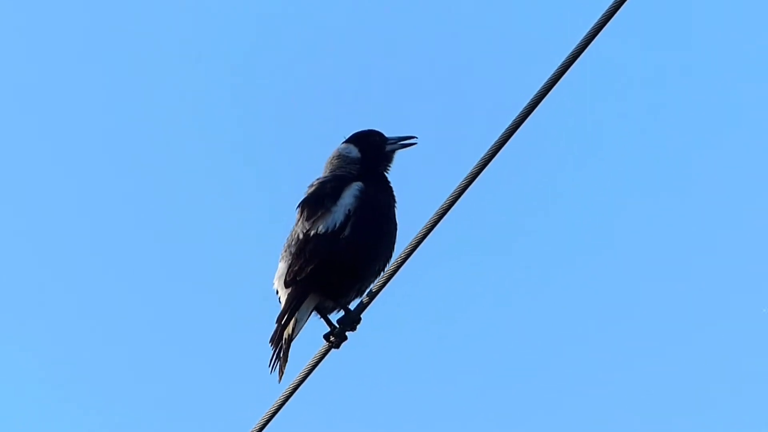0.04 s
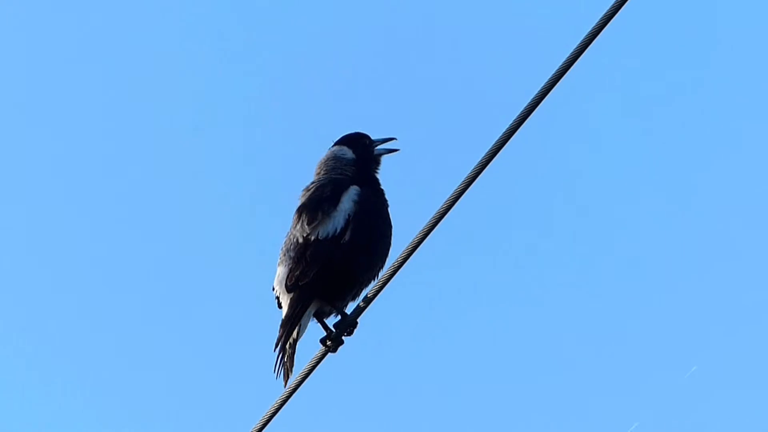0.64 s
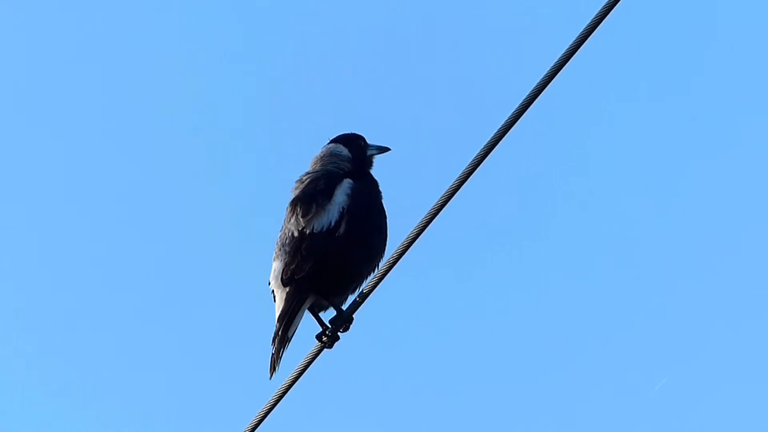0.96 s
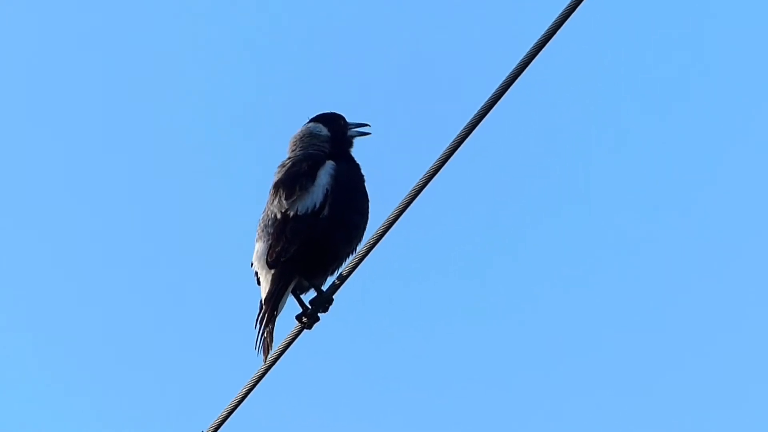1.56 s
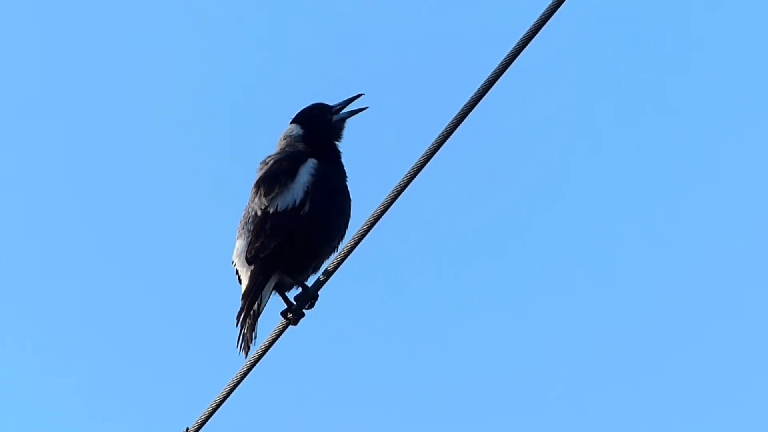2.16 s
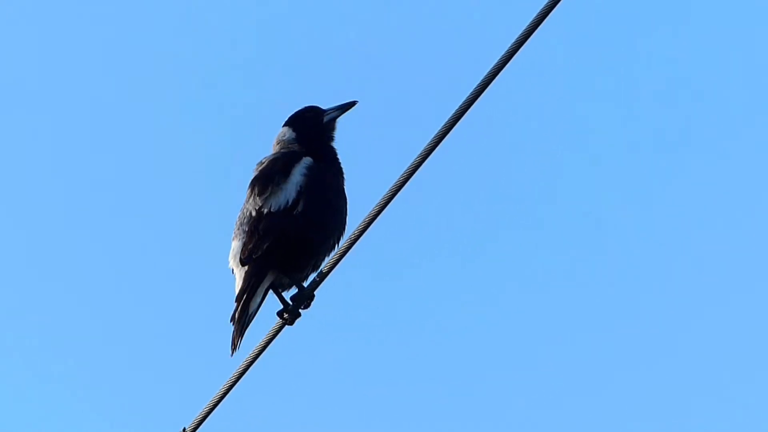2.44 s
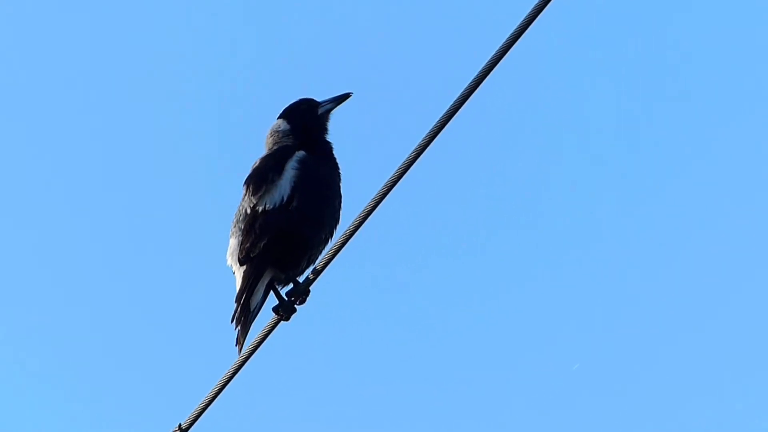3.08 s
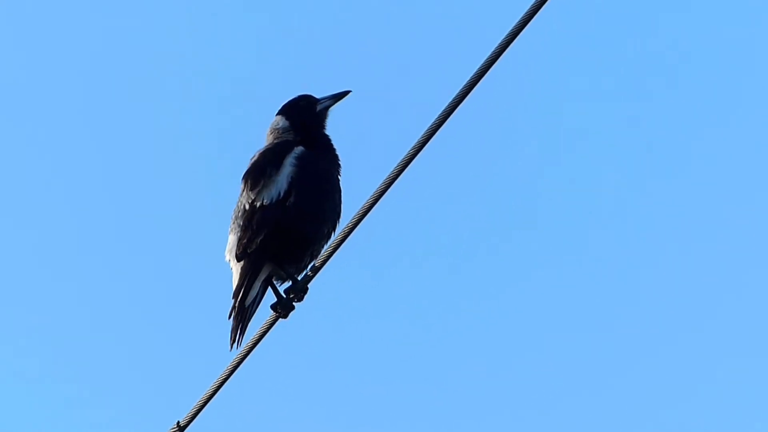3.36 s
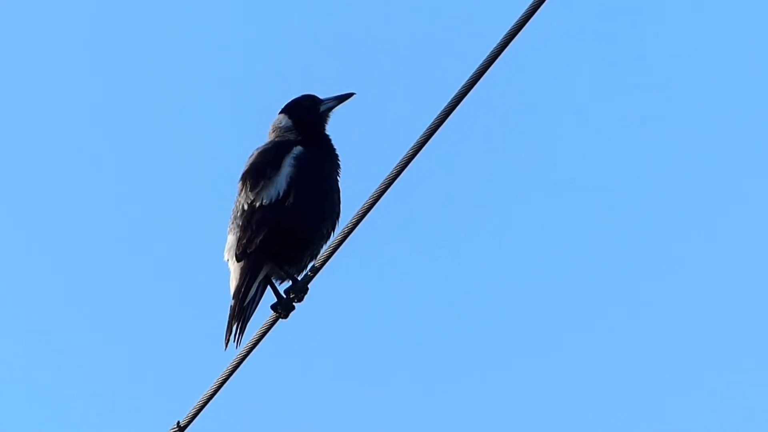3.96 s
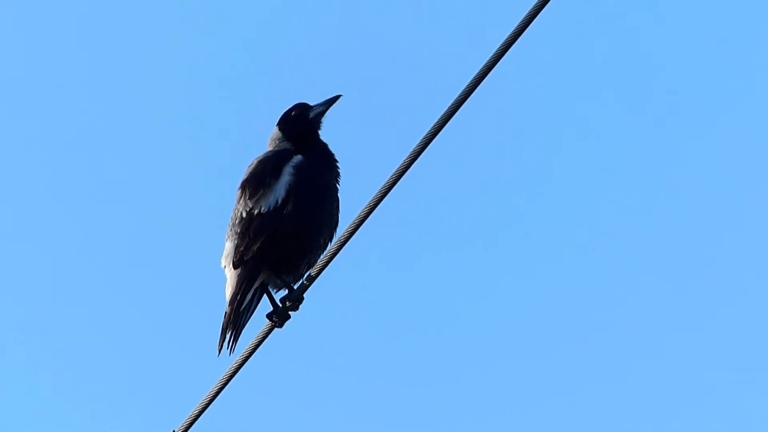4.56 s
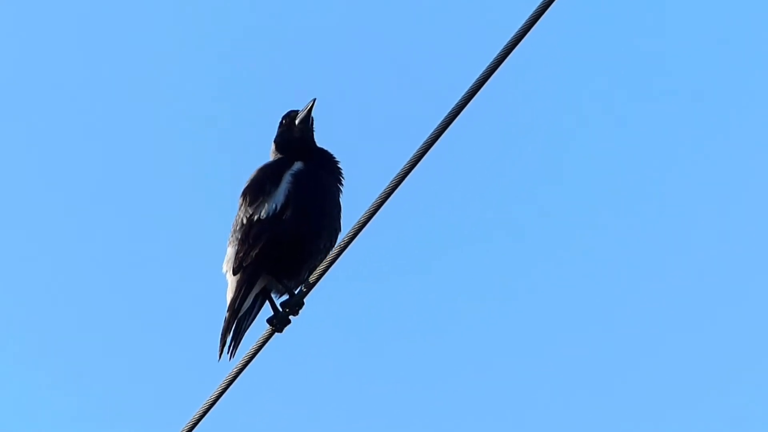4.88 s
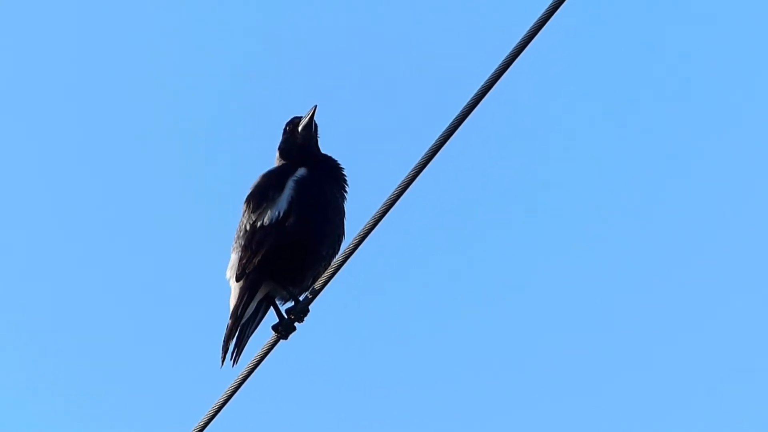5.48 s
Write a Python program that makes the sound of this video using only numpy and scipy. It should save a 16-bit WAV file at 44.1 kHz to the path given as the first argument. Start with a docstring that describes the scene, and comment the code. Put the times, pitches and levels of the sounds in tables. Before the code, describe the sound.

Short warbling, sometimes raspy magpie phrases, with a small bird chipping to the right and a soft traffic murmur behind.

```python
"""A magpie warbles straight ahead, its voice turning harsh and then clear again.
It sings with both sides of its voice box (the syrinx), so two close tones beat against each other.
A smaller bird to the right chips and slurs, others twitter further off; houses throw back echoes.
Distant traffic murmurs under it all, and one soft knock sounds near the end."""
import sys
import numpy as np
from scipy import signal
from scipy.fft import rfft, irfft
from scipy.io import wavfile
from scipy.ndimage import uniform_filter1d

SR = 44100
rng = np.random.default_rng(int(sys.argv[2]) if len(sys.argv) > 2 else 0)


def pcm_store(signal):
    """Save signal as 16-bit PCM."""
    levels = np.round(np.clip(np.atleast_2d(signal), -1, 1) * 32767)
    wavfile.write(sys.argv[1], SR, levels.astype(np.int16).T)


N = 252252
T = np.arange(N) / SR


def magpie(rough_hz=95, jitter=0.0045, rasp=0.14, hiss_db=-16, sharpness=0.68, ring_db=-12):
    """Two membranes share one airflow; its peaks make overtones and hiss, which the windpipe colours."""
    # windpipe resonances with the beak half open: f/Hz, level/dB
    windpipe_half = [(1600, 8), (2200, 8.5), (2700, -11.5), (3200, -5.5), (4100, 1.5), (4700, 11),
                     (5400, 7), (6400, -10.5), (7200, -6), (8200, -7), (9300, -15.5), (11000, -13.5),
                     (13000, -58)]
    # the same with the beak wide and the neck stretched: f/Hz, level/dB
    windpipe_wide = [(1600, -4), (2200, 8), (2800, -20.5), (4000, -6.5), (4600, 0), (5300, 8.5),
                     (6100, 0.5), (6700, -10), (7700, -0.5), (9100, -4.5), (9900, -18), (10800, -12),
                     (13000, -44)]
    # how the beak moves: t/s, opening (0 half open, 1 wide)
    beak_moves = [(1.8, 0.06), (2.1, 0.63), (2.5, 1), (2.7, 0.32)]
    hz, tone_gain, overtone_gain, apart_hz, second_db, rough = magpie_melody()
    phase = turn(hz * (1 + jitter * wander(87)))
    second_tone = undb(second_db) * np.exp(1j * turn(apart_hz * (1 + 0.0686 * wander(30.6))))
    # in harsh notes the membranes swing chaotically in size and phase
    chaos = rough * (wander(rough_hz) + 1j * wander(rough_hz))
    flow = np.exp(1j * phase) * (1 + second_tone + chaos)
    flow /= np.sqrt(uniform_filter1d(np.abs(flow) ** 2, size=900))  # even out slow level changes
    raspy_phase = np.angle(flow) + rasp * (0.17 + 2.9 * np.sqrt(np.abs(rough))) * wander(410)
    overtones = sum(np.cos(k * raspy_phase) * (k * hz < .42 * SR) for k in range(2, 11))
    hiss = undb(hiss_db) * (.5 + 2 * rough) * rng.standard_normal(N)
    source = (unit(overtones) + hiss) * np.abs(flow) ** sharpness
    wide = np.clip(curves(beak_moves)[0], 0, 1)
    buzz = (1 - wide) * unit(colour(source, windpipe_half)) + wide * unit(colour(source, windpipe_wide))
    # pushed hard, the half-open beak also rings high up
    effort = np.minimum(2 * np.log10(np.maximum(overtone_gain / undb(-52), 1)), 1)
    ring = unit(colour(source, [(6800, -23), (8200, 3), (9400, -30), (11000, -29), (13000, -55)]))
    buzz += undb(ring_db) * effort * (1 - wide) * ring
    # the voice breaks off for an instant where the pitch leaps
    octaves_per_s = uniform_filter1d(np.abs(np.gradient(np.log2(hz))) * SR, size=150)
    singing = 1 / (1 + (octaves_per_s / 55) ** 4)
    return singing * (unit(flow.real) * tone_gain + buzz * overtone_gain)


def magpie_melody(swell_db_per_s=33, fade_db_per_s=78, swing_decay_s=0.0446, converge=0.22):
    """Curves that steer the voice: each note glides, swells and fades as its two tones draw together."""
    # gliding notes: t/s, length/s, start/Hz, end/Hz, level/dB, place of the crest (0-1),
    # overtones against the tone/dB, second tone's offset/Hz, its level against the tone/dB,
    # roughness (0-1)
    glides = [(.019, 0.02, 840, 845, -41.5, 0.7, -20, 104, -14, 0.25),
              (0.044, .026, 1264, 1270, -39, 0.5, -17.5, 160, -4, 0.9),
              (0.074, .115, 1190, 1240, -32, 0.77, -11, 149.5, -1, 0.74),
              (.25, .056, 1574, 1530, -36.5, .95, -29, 230, -8, 0.2),
              (.308, .051, 1611, 1620, -28.5, 0.65, -24.5, -110, -5.5, .24),
              (0.36, 0.021, 1030, 1240, -39, 0.9, -10.5, -150, -8, 0.29),
              (0.385, .031, 1011, 1308, -33, 1, -14, -150, -16.5, .22),
              (.423, .029, 1178, 1277, -34, 0.9, -16.5, -210, -4.5, 0.48),
              (.579, .029, 1643, 1626, -38.5, 0.9, -12, -340, 2, 0.55),
              (.628, .069, 1349, 1302, -28, 0.63, -12.5, 105, -0.5, 0.12),
              (.698, .093, 1332, 1318, -22.5, 0.09, -20.5, 110, -6, .08),
              (.859, .055, 1646, 1628, -31.5, 0, -19, 164, -3.5, 0.16),
              (0.918, .053, 1290, 1220, -42, 0.75, -14.5, -230, -8, 0.58),
              (1.215, 0.064, 1635, 1612, -33, 0.8, -20.5, -170, 3, 0.27),
              (1.301, .027, 1210, 1185, -51, 0.4, -17, 168, -10, .5),
              (1.331, .018, 1301, 1417, -34.5, 0.58, -34, 168.5, -19, 0.41),
              (1.361, .027, 1308, 1347, -33.5, 0.02, -19.5, 169.5, -8, 0.65),
              (1.403, 0.025, 1203, 1190, -49, .5, -15, 113, -18, 0.5),
              (1.464, .022, 960, 920, -46, 0.2, -19.5, 112, -21, 0.7),
              (1.484, .026, 1560, 1530, -42.5, .5, -19, -590, -10, 0),
              (1.511, .098, 1050, 820, -42.5, 0.37, -13.5, 620, 2.5, 0.72),
              (2.021, .028, 1828, 1625, -39.5, .7, -17, -190, -1.5, 0.4),
              (2.065, .031, 1620, 1590, -31.5, 0.61, -18, 84, -19, 0.08),
              (2.187, .022, 1480, 1606, -33.5, 0.13, -12.5, 398, -7.5, 0.9),
              (2.213, .033, 1720, 1689, -30.5, 0.4, -7, 180.5, -6, 0.14),
              (2.25, .012, 1708, 2037, -40.5, .5, -1.5, 176.5, 0, 0.5),
              (2.658, .025, 1030, 790, -45, 0.44, -27, -190, -6.5, 0.14),
              (2.691, .026, 1435, 1465, -39.5, 0.78, -15, 168.5, -7.5, 0.65),
              (2.723, .232, 1329, 1250, -27.5, 0.16, -26, 112, -3, 0.55),
              (3.011, 0.085, 810, 772, -43, 0.47, -23, -140, -6.5, .1),
              (3.138, .118, 1030, 1000, -34.5, 0.18, -22, -73.5, -6.5, 0.17)]
    # notes whose pitch swings and settles, mostly clear warbles, one a harsh flick: the same columns, then
    # first swing of pitch/Hz, swing rate/Hz
    warbles = [(.791, 0.065, 1596, 1608, -31.5, 0.39, -16.5, 153, -35, .06, 53, 11.9),
               (1.638, 0.16, 1395, 1461, -25.5, 0.29, -19, 81.7, -29, 0.068, 56.5, 17),
               (2.1, 0.092, 1474, 1490, -27, 0.27, -17.5, 73.6, -3, 0.14, -65, 17),
               (2.269, 0.028, 1614, 1785, -28.5, 0.12, -7, 200, -8.5, .25, -280, 21),
               (2.306, 0.037, 1459, 1485, -25.5, .5, -15.5, 134, -17, .08, -115, 20.45),
               (2.349, .093, 1502, 1520, -23.5, 0.53, -13.5, 149.8, -23, 0.045, -86, 13)]
    notes = sorted([tuple(row) + (0, 0) for row in glides] + [tuple(row) for row in warbles])
    held, tone_gain, overtone_gain = np.zeros((4, N)), np.zeros(N), np.zeros(N)
    last_end = -notes[0][0]
    for s, length, start, end, db, crest, over_db, apart_hz, second_db, rough, swing_hz, rate in notes:
        t = T - s
        elapsed = np.clip(t, 0, length)
        progress = elapsed / length
        swing = swing_hz * np.cos(2 * np.pi * rate * elapsed) * np.exp(-elapsed / swing_decay_s)
        hz = start + (end - start) * progress + swing
        # the voice box is reset halfway through the gap before the note
        reset = int((last_end + s) / 2 * SR)
        last_end = s + length
        held[:2, reset:] = hz[reset:], apart_hz * (1 + converge * (.5 - progress[reset:]))
        held[2:, reset:] = [[second_db], [rough]]
        past_crest = elapsed - crest * length
        swell_db = np.minimum(swell_db_per_s * past_crest, -fade_db_per_s * past_crest)
        gate = ramp(t, 0.003 + 0.041 * length) * ramp(length - t, 0.0031)  # long notes start more gently
        tone_gain += gate * undb(db + swell_db)
        overtone_gain += gate * undb(db + over_db + 0.79 * swell_db)  # overtones swell and fade less
    hz, apart_hz, second_db, rough = uniform_filter1d(held, size=340, axis=1)
    return hz, tone_gain, overtone_gain, apart_hz, second_db, rough


def small_bird(pitch_arch=0.0373, wobble=0.014, fade_db_per_s=170):
    """Chips and slurs: quick runs of arched syllables that fade once the call is past its peak."""
    # syllables of a chip, timed from its sharp upward flick:
    # t/s, length/s, start/Hz, end/Hz, level against the call/dB, buzz (0-1)
    chip = [(-.052, .025, 4064, 4470, -9, 0.86), (-.026, .023, 3714, 3578, -2, 0.06),
            (-.005, 0.011, 3707, 4340, -2, 0.93), (.007, .014, 3250, 3250, -4, .12),
            (.023, .046, 3272, 2985, 3, 0.62)]
    # syllables of a falling slur, same columns
    slur = [(-.05, 0.048, 4150, 4200, -9, .9), (-.017, .037, 3726, 3430, 1, 0.71),
            (.018, .036, 3152, 2755, -4, .5)]
    # when the bird chips: t/s, level/dB
    chip_calls = [(.759, -37.5), (1.793, -37.5), (2.764, -35.5), (3.721, -39)]
    # when it slurs: t/s, level/dB
    slur_calls = [(0.916, -40), (3.142, -41)]
    out = np.zeros(N)
    for syllables, calls in ((chip, chip_calls), (slur, slur_calls)):
        for s, db in calls:
            for offset, length, start, end, syllable_db, buzz in syllables:
                progress = np.linspace(0, 1, int(length * SR))
                arch = np.abs(np.sin(np.pi * progress))
                glide_hz = start + (end - start) * progress
                hz = glide_hz * (1 + pitch_arch * arch + wobble * wander(37.5, len(progress)))
                fade_db = -fade_db_per_s * np.maximum(offset + length * progress, 0)
                add(out, s + offset, undb(db + syllable_db + fade_db) * arch ** 0.53 * whistle(hz, buzz))
    return out


def whistle(hz, buzz, second_ratio=1.14, flutter_hz=290, octave_db=-29):
    """A small bird's tone; in buzzy parts a higher second voice joins and both flutter."""
    size = len(hz)
    flutter = buzz * np.sin(turn(flutter_hz * (1 + 0.262 * wander(94, size))))
    shake = .04 * flutter + .012 * wander(120, size)
    low, high = (turn(hz * (ratio + shake + .035 * buzz * wander(400, size)))
                 for ratio in (1, second_ratio))
    second_gain = buzz * undb(-3)
    voices = np.sin(low) + second_gain * np.sin(high) + undb(octave_db) * np.sin(2 * low)
    return unit(voices * (1 + 0.98 * flutter))


def far_birds(pitch_arch=.025):
    """Scattered clear twitters from birds further off."""
    # one twitter a row: t/s, length/s, start/Hz, end/Hz, level/dB, buzz (0-1)
    calls = [(0.256, 0.15, 6860, 6060, -68, .3), (1.023, 0.081, 4100, 3850, -59, 0.42),
             (1.248, 0.22, 3080, 3766, -59, 0.51), (1.921, 0.031, 3645, 5250, -56.5, 0.67),
             (1.926, 0.076, 6554, 7400, -60.5, 0.16), (1.978, 0.072, 6980, 6770, -59, 0.19),
             (2.41, 0.15, 6480, 6350, -62, 0.15), (2.965, 0.068, 7220, 6600, -61.5, .27),
             (3.467, .15, 3020, 2314, -69.5, 0.16), (3.845, 0.077, 4420, 5180, -63, 0.5),
             (4.018, 0.056, 3850, 4100, -60.5, 0.4), (4.12, 0.039, 2930, 2910, -70, 0),
             (4.204, .034, 4150, 5140, -66, .3), (4.419, 0.035, 6540, 6460, -63, 0.16),
             (4.419, 0.033, 1590, 1580, -63.5, 0), (4.594, .024, 5030, 4600, -66, 0),
             (4.671, 0.062, 4250, 4920, -56.5, 1), (4.772, 0.038, 3730, 4730, -57, 0.88),
             (5.431, .07, 4480, 4410, -61, 0.56), (5.518, 0.052, 3770, 4940, -56, 0.6),
             (5.59, 0.059, 3060, 2930, -62, .66), (5.599, 0.063, 3910, 5070, -59, 0.8)]
    out = np.zeros(N)
    for s, length, start, end, db, buzz in calls:
        middle = (start + end) / 2 * (1 + pitch_arch)
        add(out, s, undb(db) * twitter(length, start, middle, end, buzz))
    return out


def flock(count=90, level_db=-76):
    """Many short notes from birds far away, very faint."""
    out = np.zeros(N)
    for when, pitch, length, slope in rng.random((count, 4)):
        hz = 2900 + 2400 * pitch
        glide_hz = hz * .15 * (slope - .5)
        note = twitter(.03 + .06 * length, hz - glide_hz, hz, hz + glide_hz, buzz=.3)
        add(out, when * T[-1], undb(level_db) * note)
    return out


def twitter(length, start, middle, end, buzz):
    """One short, wobbly glide through three pitches; buzz adds a second voice above it."""
    progress = np.linspace(0, 1, int(length * SR))
    hz = np.polyval(np.polyfit([0, .5, 1], [start, middle, end], 2), progress)
    phase = turn(hz * (1 + (.01 + .025 * buzz) * wander(110, len(progress))))
    voices = np.sin(phase) + buzz * np.sin(1.14 * phase)
    return np.sqrt(np.abs(np.sin(np.pi * progress))) * unit(voices)


def knock(at_s=5.1125, tick_lead_s=0.0085, contact_s=0.0011):
    """A light tick, then a soft blow that sets a few dull tones ringing."""
    # the ringing tones: f/Hz, relative level/dB, time to fade by 60 dB/s
    modes = [(310, -6, 0.038), (586, 4, 0.025), (720, 1, 0.025), (1130, -4, 0.049), (1410, -11, .02),
             (1930, -2.5, 0.029), (2230, 13, 0.0044), (2930, 3.5, 0.0083)]
    out, t = np.zeros(N), np.arange(SR // 10) / SR
    ring = sum(undb(db) * np.sin(2 * np.pi * hz * t + rng.uniform(0, 2 * np.pi)) * die_away(t, t60)
               for hz, db, t60 in modes)
    add(out, at_s, 2 * undb(-46) * ring * (1 - np.exp(-t / contact_s)))
    tick = colour(rng.standard_normal(len(t)), [(1000, -10), (5000, 0), (10000, -1), (15000, -12)])
    add(out, at_s - tick_lead_s, undb(-53) * tick * np.exp(-t / .004))
    return out


def echoes(x, echo_db, scatter_db, t60, smear_s=0.0067):
    """Dull echoes, smeared by uneven house fronts, and a thin tail scattered by trees."""
    # bounces off the ground and houses: delay/s, relative level/dB, left minus right/dB
    bounces = [(0.025, -24, 25.5), (0.06, -18, -7.5), (.152, -25.5, -8.5), (0.205, -31, -7.5)]
    t = np.arange(SR) / SR
    tail = unit(rng.standard_normal((2, SR)) * die_away(t, t60)) / np.sqrt(SR)
    response = undb(scatter_db) * tail
    for s, db, pan_db in bounces:
        bounce = unit(rng.standard_normal(SR) * np.exp(-np.abs(t - s) / smear_s)) / np.sqrt(SR)
        response += pan(bounce, pan_db) * undb(db + echo_db)
    dull = colour(x, [(1500, 3.4), (4500, 1.6), (9000, 1.5)])
    return signal.fftconvolve(dull[None], response, axes=1)[:, :N]


def traffic_murmur(middle_db=-59):
    """Wide, steady noise: a middle part both ears share, and a side part opposite in each ear."""
    # tone colour of the murmur: f/Hz, relative level/dB
    spectrum = [(15, -50), (25, -25), (96, -3), (215, -4), (378, -1.5), (1170, -1), (1270, -9.5),
                (1490, -5.5), (1660, -9), (3630, -15), (4150, -10.5), (5140, -18), (6730, -18), (7500, -20),
                (15500, -26)]
    # how wide it sounds: f/Hz, side minus middle/dB
    width = [(60, -1.5), (110, -12), (200, 2), (380, 5), (700, 6), (1290, 1), (2380, -1.5), (4400, -4),
             (8120, -2), (15000, -4.5)]
    middle, side = (unit(colour(rng.standard_normal(N), spectrum)) for _ in range(2))
    side = colour(side, width)
    flicker_db = .25 * wander(5)
    return (middle + side * np.array([[1], [-1]])) * undb(middle_db + flicker_db)


def far_engine():
    """A far engine hums with its octave, sinking in pitch as it comes and goes."""
    # course of the hum: t/s, f/Hz, level/dB
    course = [(0, 135, -85), (1.3, 132, -78), (2.4, 126, -68), (3.1, 120, -77.5), (3.7, 92, -92),
              (4.2, 88, -76), (5.7, 88, -71)]
    hz, db = curves(course)
    shaft = turn(hz * (1 + 0.0302 * wander(7.2)))
    hum = np.sin(shaft) + 0.62 * np.sin(2 * shaft)
    return undb(db) * unit(hum * (1 + 0.22 * wander(8.7)))


def far_tone(hz=1281, level_db=-70.5):
    """A faint tone in the distance that wavers in pitch and loudness."""
    tone = np.sin(turn(hz * (1 + 0.00698 * wander(13.26))))
    return undb(level_db) * unit(tone * (1 + .5 * wander(3.05)))


def undb(db):
    """Turn decibels into a factor to multiply by."""
    return 10 ** (np.asarray(db) / 20)


def unit(x):
    """Scale to an average (rms) level of 1."""
    return x / np.sqrt(np.mean(np.abs(x) ** 2))


def curves(rows):
    """Join a table's values by straight lines; its first column is the time."""
    s, *columns = np.transpose(rows)
    return [np.interp(T, s, column) for column in columns]


def colour(x, points):
    """Shape the tone colour along a curve of points: f/Hz, level/dB."""
    hz, db = np.transpose(points)
    f = np.fft.rfftfreq(x.shape[-1], 1 / SR)
    return irfft(rfft(x) * undb(np.interp(np.log(f + 1), np.log(hz), db)), x.shape[-1])


def wander(hz, size=N):
    """A smooth random drift of typical size 1, moving at up to about hz."""
    f = np.fft.rfftfreq(size, 1 / SR)
    return unit(irfft(rfft(rng.standard_normal(size)) * np.exp(-.5 * (f / hz) ** 2), size))


def turn(hz):
    """The phase (angle turned so far) of a tone with this pitch."""
    return 2 * np.pi * np.cumsum(hz) / SR


def ramp(t, tau_s):
    """A soft step from 0 to 1 around t = 0."""
    return .5 + .5 * np.tanh(.5 * t / tau_s)


def die_away(t, t60):
    """A fade that loses 60 dB every t60 seconds."""
    return np.exp(-np.log(1000) * t / t60)


def pan(x, db):
    """Place a sound by its left minus right level."""
    return x * undb(np.array([[db], [-db]]) / 2)


def add(track, s, x):
    """Mix a short sound in at s seconds."""
    i = int(s * SR)
    track[i:i + len(x)] += x[:N - i]


def scene():
    """The magpie straight ahead, the small bird to the right, the rest further away."""
    song, chips, twitters = magpie(), small_bird(), far_birds() + flock()
    ahead = pan(song, 0.29) + echoes(song, echo_db=-1, scatter_db=-17, t60=1)
    right = pan(chips, -8) + echoes(chips, echo_db=-1.5, scatter_db=-13.5, t60=1)
    distant = pan(twitters, -3) + echoes(twitters, echo_db=3, scatter_db=-6, t60=.7)
    return ahead + right + distant + pan(knock(), 0.46) + traffic_murmur() + far_engine() + far_tone()


def record(dry, top_hz=15500):
    """Cut away the highest treble."""
    return signal.sosfilt(signal.ellip(10, .2, 80, top_hz, fs=SR, output="sos"), dry)


dry = scene()
out = record(dry)
pcm_store(out)
```